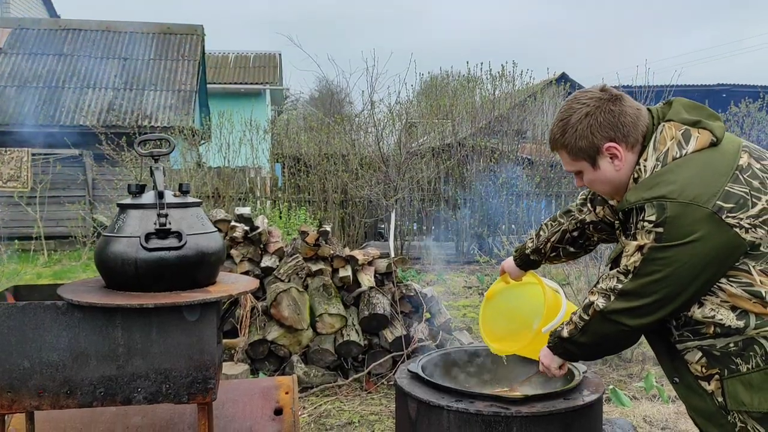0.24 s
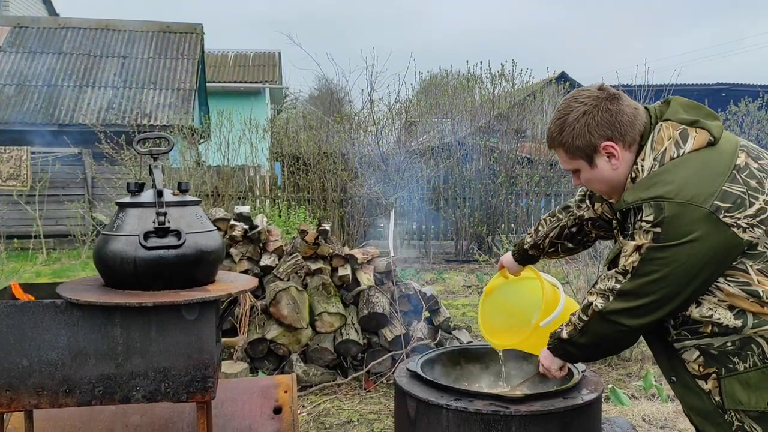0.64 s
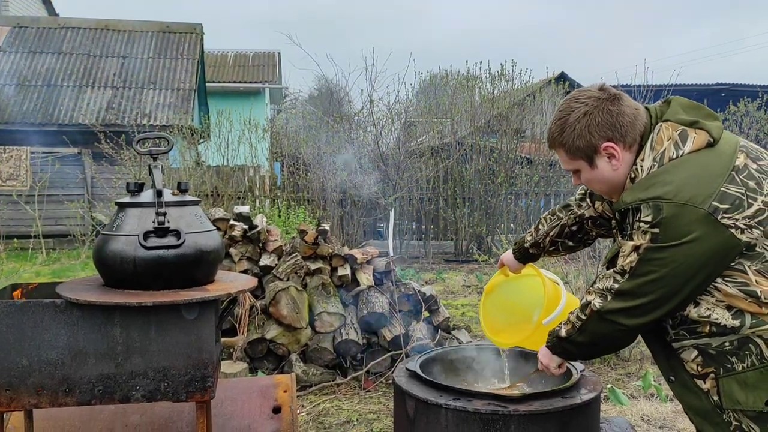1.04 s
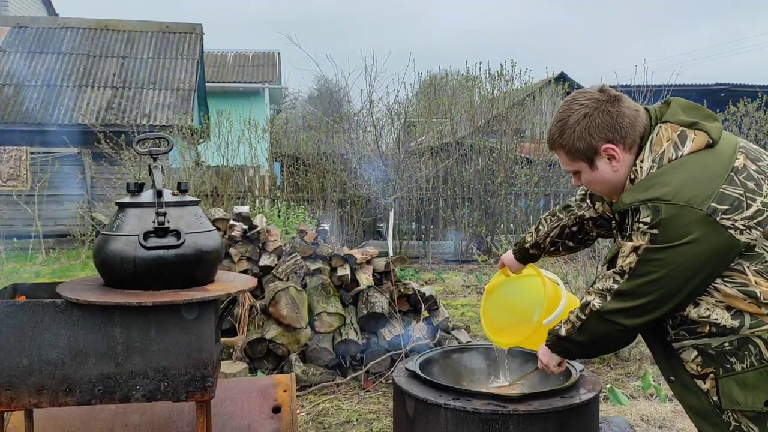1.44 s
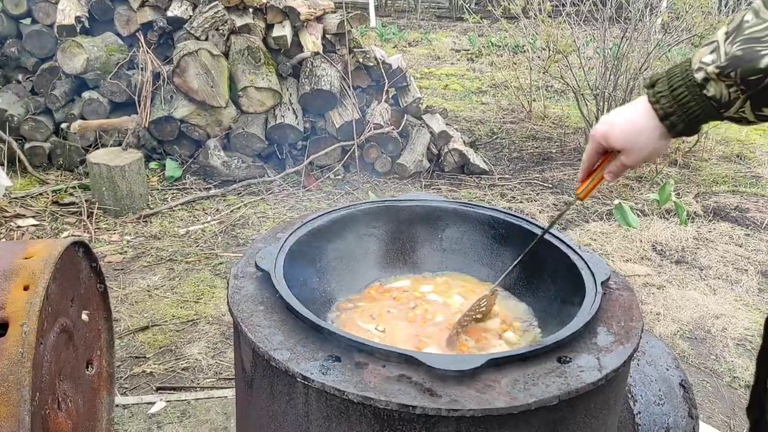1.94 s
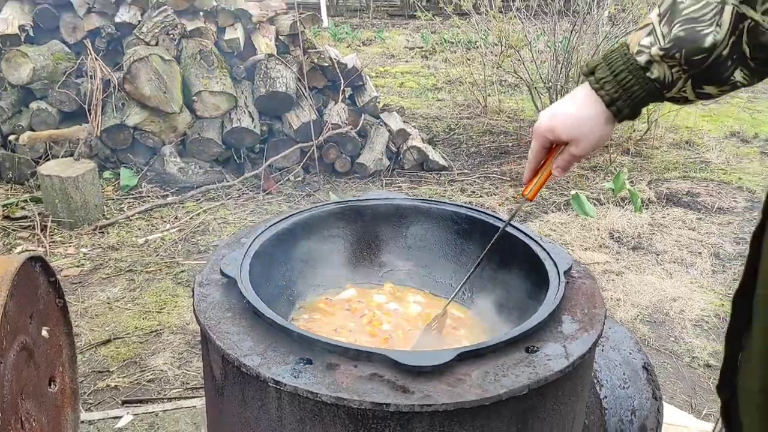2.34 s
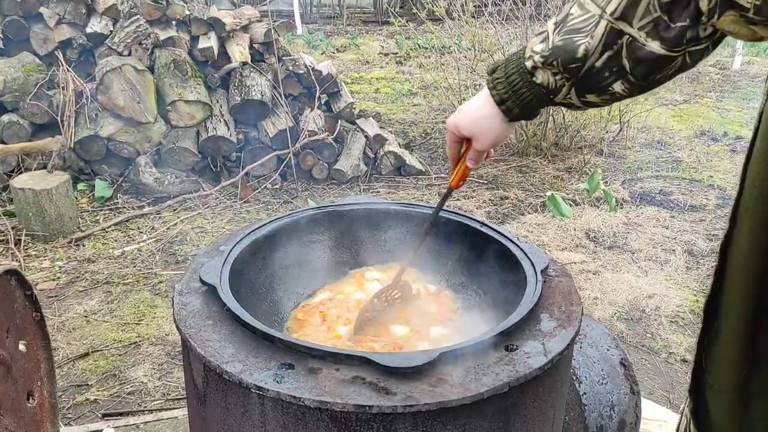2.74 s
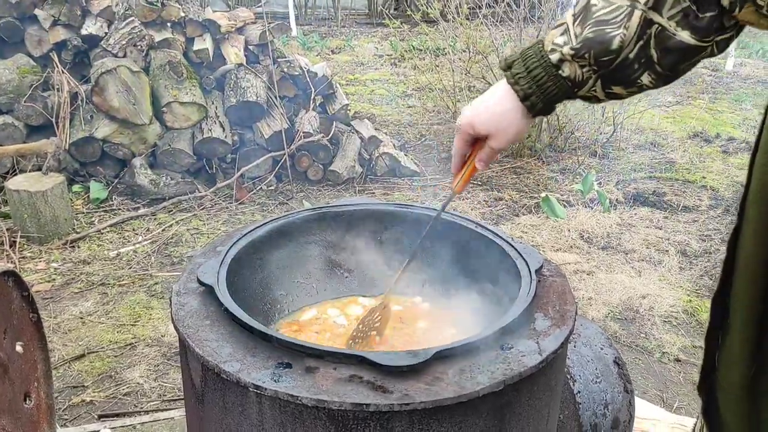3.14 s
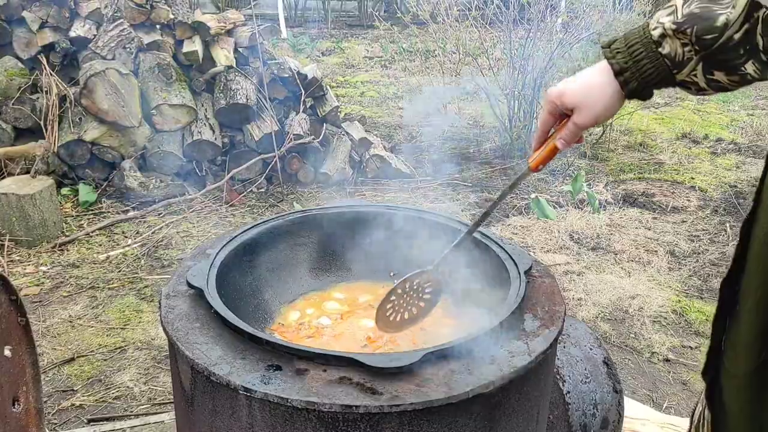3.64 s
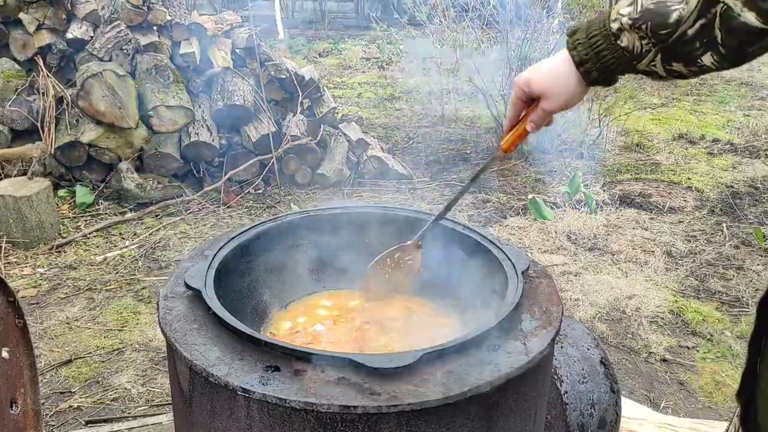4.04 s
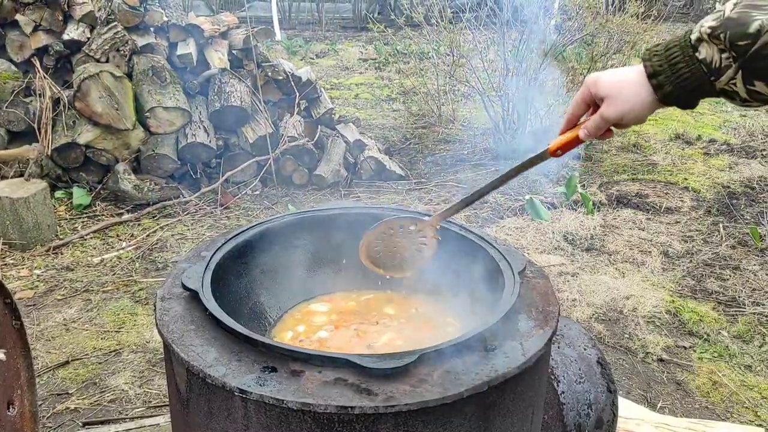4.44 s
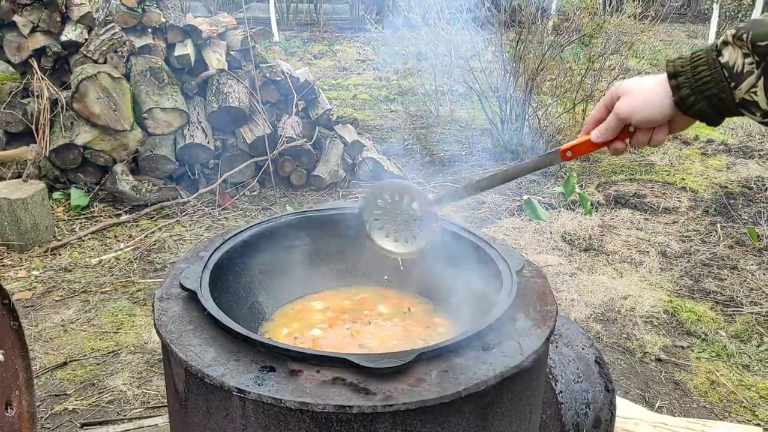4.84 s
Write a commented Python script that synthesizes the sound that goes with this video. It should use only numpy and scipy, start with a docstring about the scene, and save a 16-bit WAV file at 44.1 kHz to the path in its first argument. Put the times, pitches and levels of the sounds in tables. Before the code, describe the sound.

A bright, spiky sizzle comes from a short distance as water meets hot fat in an iron pot in the open air, while gusts rumble and thud on the microphone, then fade. A soft, deep thump marks a shift to a close position. The broth now boils with a thicker hiss, sharp spits and wet plops, swelling with each stir and easing off at the finish.

```python
"""Outdoors, water pours from a bucket onto fried food in a hot cast-iron pot. It fizzes on the iron,
drops spit in the fat and bubbles plop, while wind buffets the microphone and dies away.
At about 1.7 s the scene changes: with a deep thump, the pot fades in from close by. The broth sizzles
and bubbles, flaring up as a steel skimmer pushes it onto the hot wall, and calms near the end.
Throughout, the microphone's two openings (left and right) each colour the hiss in their own way."""
import sys
import numpy as np
from scipy import signal
from scipy.fft import rfft, irfft, next_fast_len
from scipy.io import wavfile
from scipy.ndimage import map_coordinates

SR = 44100
rng = np.random.default_rng(int(sys.argv[2]) if len(sys.argv) > 2 else 0)


def store_wav(level_fs):
    """Save 16-bit WAV to argv[1]."""
    pcm = np.round(np.clip(np.atleast_2d(level_fs), -1, 1) * 32767)
    wavfile.write(sys.argv[1], SR, pcm.T.astype(np.int16))


N = 225218


def pouring():
    """Water hits the hot fat a few steps away and makes a spiky crackle."""
    # tone of a bursting droplet from afar: frequency_hz, left_db, right_db
    far_tone = [(130, -49, -53), (373, -13.5, -15.5), (500, -35, -41), (635, -15.5, -23.5), (890, -21, -23),
                (1450, -19.5, -20.5), (2920, -13, -15), (4150, -20.5, -21), (5470, -10, -9.5),
                (7070, -15, 2.5), (8080, -4.5, -10), (10230, -17, -26.5), (12400, -16.5, -28),
                (15000, -20, -31)]
    fizz = unit(crackle(per_s=9000, spread_db=2, clump_db=1.37, scatter_s=5e-5, lag_s=5e-5))
    fizz += amp(-16) * ticking(per_s=79, ring_hz=7400, spread_db=2.5)
    boil = crackle(per_s=3500, spread_db=2, clump_db=1.8, scatter_s=7e-5, lag_s=5e-5)
    boil = unit(boil) + amp(-16) * bubbling(per_s=350, pitch_hz=2180, cycles=5.5, spread_db=3)
    hiss = sizzle(pour_levels(), far_tone, fizz, boil, fizz_gain_db=5, boil_gain_db=2.5)
    return hiss + spits(far_tone, gain_db=-3.5, ring_hz=7700, crack=0.11, spray_db=-23, spray_s=0.013)


def pour_levels():
    """Fizz and boil levels in dB: gushes reach fresh hot iron, lulls let it dry."""
    # gushes and lulls: time_s, extra_fizz_db, extra_boil_db
    gushes = [(.09, 4.5, 2), (.31, 1.5, 1), (.82, -1.5, -1), (.95, 0, 2.5), (1.07, 2.5, 1),
              (1.19, -1.5, 1.5), (1.35, -0.5, 4.5), (1.62, 2, 2)]
    steady_db = np.array([[-40.5], [-50.5]])  # fizz, boil
    gush_db = sum(np.outer([fizz, boil], swell(s, 0.067, 0.058)) for s, fizz, boil in gushes)
    return steady_db + gush_db + 0.54 * wobble(13.4)


def stirring():
    """Close by, the whole broth boils: a dense sizzle with fine spatter on top."""
    # tone of a bursting droplet close by: frequency_hz, left_db, right_db
    near_tone = [(121, -39.5, -43), (275, -16, -20.5), (530, -22, -28), (624, -15, -17.5),
                 (1180, -18.5, -19), (1525, -23, -17.5), (2360, -13, -13.5), (2980, -11.5, -18),
                 (3360, -14, -21.5), (3900, -19, -11.5), (6220, -11.5, -5.5), (7030, -17, 1),
                 (8060, -3, -4), (8340, -2, -7), (9300, -11.5, -10.5), (9660, -20, -22.5),
                 (11100, -15, -22), (12800, -18.5, -23.5), (15000, -17.5, -18)]
    levels_db = stir_levels()
    fizz = unit(crackle(per_s=12000, spread_db=3, clump_db=1.04, scatter_s=5e-5, lag_s=-3e-5))
    fizz += amp(-16.5) * ticking(per_s=110, ring_hz=7250, spread_db=2)
    boil = crackle(per_s=5000, spread_db=2.5, clump_db=1.5, scatter_s=6e-5, lag_s=-6.9e-5)
    boil = unit(boil) + amp(-12) * bubbling(per_s=700, pitch_hz=2019, cycles=7.44, spread_db=1.5)
    hiss = sizzle(levels_db, near_tone, fizz, boil, fizz_gain_db=4.5, boil_gain_db=1.5)
    hiss += amp(levels_db[0] - 24) * spatter()  # follows the fizz
    return hiss + spits(near_tone, gain_db=-2.5, ring_hz=7600, crack=0.75, spray_db=-15.5, spray_s=0.012)


def stir_levels():
    """Fizz and boil levels in dB: broth washing up the hot wall lifts mainly the fizz."""
    # the broth boils hard while stirred and calms when the skimmer lifts: time_s, level_db
    broth = [(2, -38.5), (2.3, -37), (2.5, -38.5), (2.95, -37), (3.43, -37), (3.75, -36.5), (4.1, -37.5),
             (4.3, -43), (4.95, -41), (5.1, -45.5)]
    # skimmer strokes, run-off and a lull: peak_s, extra_fizz_db, rise_s, fall_s
    flares = [(2.02, 0.5, 0.15, 0.036), (2.14, 4, 0.08, 0.044), (2.32, 1.5, 0.08, 0.11),
              (2.91, 4, 0.17, 0.042), (3.2, 1.5, 0.24, 0.048), (3.4, -3, 0.037, 0.16),
              (3.63, 1.5, 0.035, 0.07), (3.91, 4, 0.093, 0.12), (4.22, 3, 0.1, 0.52),
              (4.68, 1, 0.049, 0.079)]
    broth_db = np.interp(np.arange(N) / SR, *np.transpose(broth)) + 0.36 * wobble(14)
    flare_db = sum(db * swell(s, rise, fall) for s, db, rise, fall in flares)
    return np.array([broth_db + 7.5 + flare_db, broth_db + 0.29 * flare_db])


def sizzle(levels_db, tone, fizz, boil, fizz_gain_db, boil_gain_db):
    """High fizz where water meets hot iron, plus the lower seething of the broth."""
    fizz = unit(passed(coloured(fizz, tone), "high", 3960))
    boil = unit(passed(coloured(boil, tone), "low", 3810))
    return amp(levels_db[0] + fizz_gain_db) * fizz + amp(levels_db[1] + boil_gain_db) * boil


def crackle(per_s, spread_db, clump_db, scatter_s, lag_s, paths=3):
    """Tiny bursts all over the pot, heard directly and then bouncing off the iron wall."""
    count = int(per_s * N / SR)
    start = rng.uniform(0, N, count)
    strength = amp(spread_db * np.minimum(rng.exponential(size=count), 4.5))
    strength *= rng.choice([-1, 1], count)
    out = np.zeros((2, N))
    for bounce in range(paths):
        arrival = start + bounce * rng.uniform(.0004, .0014, count) * SR
        # each spot has its own delay between left and right
        skew = (lag_s + scatter_s * rng.standard_normal(count)) * SR / 2
        for side, at in enumerate([arrival - skew, arrival + skew]):
            out[side] += np.bincount(np.round(at).astype(int) % N, strength * 0.61 ** bounce, N)
    return out * amp(clump_db * wobble(70))  # droplets burst in clusters


def ticking(per_s, ring_hz, spread_db):
    """A few larger droplets stick out of the fizz, each with a tiny ring."""
    t = np.arange(SR // 500) / SR
    ring = np.sin(2 * np.pi * ring_hz * t) * np.exp(-t / 0.0004)
    drops = crackle(per_s, spread_db, clump_db=-3, scatter_s=3e-5, lag_s=0)
    return unit(signal.fftconvolve(drops, ring[None], axes=1)[:, :N])


def bubble(t, hz, cycles):
    """A bubble rings for a few cycles, rising in pitch as it surfaces."""
    age = t * hz / cycles
    rise = 1 + 0.037 * np.minimum(age, 4)
    return np.sin(2 * np.pi * hz * t * rise) * np.exp(-age) * (1 - np.exp(-6 * age))


def bubbling(per_s, pitch_hz, cycles, spread_db):
    """A swarm of small bubbles, each size ringing at its own pitch."""
    count, samples = int(per_s * N / SR), np.arange(500)
    hz = pitch_hz * 2 ** rng.triangular(-1.3, 0, .8, (count, 1))
    strength = amp(spread_db * np.minimum(rng.exponential(size=(count, 1)), 4))
    rings = strength * bubble(samples / SR, hz, cycles)
    at = (rng.integers(0, N, (count, 1)) + samples) % N
    return unit(np.bincount(at.ravel(), rings.ravel(), N))


def spits(tone, gain_db, ring_hz, crack, spray_db, spray_s):
    """Drops explode in hot fat: a sharp crack with a tiny ring, then spray and echoes in the pot."""
    # the loudest drops: start_s, level_db
    drops = [(0.25, -12.5), (0.3277, -12.5), (.486, -16.5), (0.637, -8.5), (.7952, -34), (0.883, -14.5),
             (.9305, -16), (0.9416, -16), (0.9467, -15.5), (0.9502, -12.5), (1.0762, -21), (1.0855, -11.5),
             (1.2716, -13.5), (1.2985, -20), (1.342, -22), (1.3528, -18), (1.5964, -10.5), (1.6228, -19),
             (1.914, -12), (2.0257, -8.5), (2.029, -10), (2.084, -4.5), (2.088, -11), (2.15, -10),
             (2.17, -8), (2.666, -11), (2.7132, -12), (2.7172, -8.5), (2.8807, -11), (2.905, -9),
             (2.9326, -3), (3.0136, -6.5), (3.0882, -5), (3.2525, -18), (3.447, -16), (3.636, -7.5),
             (3.88, -6), (3.903, -8.5), (3.919, -8), (3.9734, -12), (4.018, -13), (4.0864, -10.5),
             (4.23, -8), (4.2838, -18), (4.455, -25), (4.496, -15.5), (4.5582, -11), (4.644, -14),
             (4.702, -17), (4.752, -18), (4.892, -16), (4.9647, -16), (5.0574, -17.5), (5.0859, -19)]
    out, t = np.zeros((2, N)), np.arange(SR // 40) / SR
    for start_s, db in drops:
        hz = ring_hz * np.exp(0.035 * rng.standard_normal())
        ring = np.sin(2 * np.pi * hz * t) * np.exp(-t / 0.00015)
        ring[0] += crack
        echoes = amp(spray_db - 60 * t / spray_s) * rng.standard_normal((2, len(t)))
        echoes[:, :SR * 3 // 4000] = 0  # the wall answers 0.75 ms later
        echoes[:, 0] = 1  # the direct sound
        snap = coloured(signal.fftconvolve(echoes, ring[None], axes=1), tone)
        add(out, start_s, snap * amp(db + gain_db) / np.abs(snap.mean(0)).max())
    return out


def plops(gain_db=-9, splash_s=0.035):
    """Big bubbles burst, and near the end drips fall from the skimmer into the broth: a short ring and a wet
    splash that reaches lower for a bigger bubble or drop."""
    # big bubbles, and near the end drips off the skimmer: start_s, level_db, pitch_hz, ring_cycles, splash_gain
    bursts = [(.25, -26, 2600, 2, 1.5), (0.638, -25, 3010, 3, 1.5), (.754, -27, 2200, 2.2, 1.6),
              (.945, -27, 2600, 3, 1.3), (0.967, -30, 1900, 3.3, 1.3), (.977, -29, 2300, 3, 1.2),
              (1.139, -28.5, 1800, 3, 1.2), (1.353, -26, 2400, 2, 1.2), (1.385, -23.5, 1920, 3.2, 0.87),
              (1.596, -17.5, 2060, 7.3, 0.41), (1.604, -31, 2950, 8, .4), (2.564, -18.5, 2460, 2.7, 1.6),
              (2.905, -16, 2430, 3, 1.7), (3.012, -18.5, 2400, 3, 1.5), (3.195, -20, 2050, 16, 0.98),
              (3.933, -17, 865, 1.6, 1.8), (4.2295, -19, 935, 2.8, 1.4), (4.557, -16.5, 2500, 2.7, 1.5),
              (4.699, -14, 2170, 3.5, 1.2), (4.79, -20.5, 2400, 3.4, 1.6), (4.826, -22, 1010, 1.2, 2.1),
              (4.837, -21, 1900, 2.2, 1.8), (4.892, -27, 2320, 3, 1.2), (4.918, -25, 2290, 3, 1.6),
              (4.999, -21.5, 2100, 3, 1.3), (5.019, -28, 1800, 2.7, 1.3), (5.032, -23, 770, 1.2, 0.68)]
    out, t = np.zeros((2, N)), np.arange(SR // 25) / SR
    for start_s, db, hz, cycles, splash_gain in bursts:
        spray = rng.standard_normal(len(t)) + 0.61 * rng.standard_normal((2, len(t)))
        spray = passed(spray, "low", 3300, order=2)
        splash = passed(spray, "high", 0.41 * hz, order=2) * amp(-60 * t / splash_s)
        add(out, start_s, amp(db + gain_db) * (bubble(t, hz, cycles) + splash_gain * splash))
    return out


def spatter():
    """The finest droplets fly clear of the pot and tick, bright and dry."""
    ticks = crackle(per_s=350, spread_db=2.5, clump_db=2, scatter_s=3e-5, lag_s=0, paths=1)
    return unit(passed(ticks, "high", 10800))


def wind(breeze_db=-44, drop_at_s=0.99, drop_db_per_s=92):
    """A dying breeze rumbles and gusts flutter; each side of the microphone gets its own swirls."""
    # tone of wind on the microphone: frequency_hz, level_db
    wind_tone = [(20, 7), (50, 9), (120, -5.5), (180, -0.5), (300, -13.5), (420, -19.5), (520, -34),
                 (800, -39), (2000, -69)]
    # gusts: peak_s, level_db, half_length_s, right_share (0 to 1)
    gusts = [(0.02, -33, 0.054, 0.46), (0.153, -31.5, 0.11, 0.99), (0.251, -29, 0.034, 0.98),
             (0.47, -30, 0.028, 0.85), (0.534, -34, 0.047, 1), (0.67, -32, 0.05, 0.58),
             (0.96, -43.5, 0.028, 0.16), (1.05, -44, 0.045, 0.56), (1.224, -68, 0.04, 0.3),
             (1.373, -54, 0.021, 0.2), (1.486, -50, 0.0087, 0.17)]
    dying_s = np.maximum(np.arange(N) / SR - drop_at_s, 0)
    lull = amp([[-64], [-77]])  # left, right
    breeze = amp(breeze_db - drop_db_per_s * dying_s) + lull
    gusting = sum(pan(amp(db) * swell(s, half, half), right) for s, db, half, right in gusts)
    swirls = amp(2.5 * np.array([wobble(33.7), wobble(34.1)]))
    rumble = coloured(rng.standard_normal((2, N)), wind_tone)
    flutter = passed(coloured(rng.standard_normal((2, N)), wind_tone), "high", 91, order=1)
    return breeze * unit(swirls * rumble) + gusting * unit(swirls * flutter)


def bumps(gain_db=-2.5, roughness=0.85):
    """Air or a touch thuds on the microphone: a push that swings back ever more slowly."""
    # thuds: start_s, level_db, pitch_hz, length_s, pitch_sag, right_share (0 to 1)
    thuds = [(0.132, -23, 131, 0.0043, .45, .95), (0.242, -20, 400, 0.026, 0.5, .99),
             (.521, -21, 220, 0.0063, .3, .85), (0.615, -18, 276, 0.01, 0.41, 0.95),
             (0.663, -28.5, 340, 0.0078, .45, 0.85), (0.784, -35, 290, 0.0062, .45, 0.7),
             (.91, -36, 290, 0.0069, 0.4, 0.8), (0.97, -33.5, 170, 0.0083, .45, 0.2),
             (1.748, -30.5, 420, 0.0056, 0.33, 0.08), (1.758, -32, 220, 0.008, .3, 0),
             (4.1885, -19.5, 1050, 0.0022, .3, 0), (4.19, -18.5, 380, 0.0037, .5, 0.03),
             (4.199, -24.5, 190, 0.0094, .25, 0.04), (4.2, -26, 80, .011, .15, .03)]
    out, t = np.zeros((2, N)), np.arange(SR // 8) / SR
    for start_s, db, hz, length_s, sag, right in thuds:
        age = t / length_s
        flutter = unit(passed(rng.standard_normal(2 * len(t)), "low", hz * 1.13)[len(t):])
        swing = np.sin(2 * np.pi * np.cumsum(hz / (1 + sag * age)) / SR)
        thud = passed(age * np.exp(-2 * age) * (swing + roughness * flutter), "high", 34, order=2)
        add(out, start_s, amp(db + gain_db) * pan(thud / np.abs(thud).max(), right))
    return out


def thump(start_s=1.754, rise_s=0.0041, swing_back_s=0.088, fade_s=0.18):
    """A soft low thump, mainly left, opens the close scene; the microphone then settles unheard."""
    t = np.maximum(np.arange(N) / SR - start_s, 0)
    offset = (1 - np.exp(-(t / rise_s) ** 2)) * (1 - t / swing_back_s) * np.exp(-t / fade_s)
    return amp(-35) * np.outer([1, 0.45], offset)


def open_air():
    """The faint, steady rumble of the outdoors."""
    # tone of open air: frequency_hz, level_db
    air_tone = [(20, 19), (60, 9), (150, -7), (400, -3), (1500, -33), (8000, -48)]
    return amp(-65.5) * unit(coloured(rng.standard_normal((2, N)), air_tone))


def amp(db):
    """Turns decibels into a gain."""
    return 10 ** (np.asarray(db) / 20)


def unit(x):
    """Scales a sound to an average (rms) level of 1."""
    return x / np.sqrt(np.mean(x ** 2) + 1e-20)


def swell(peak_s, rise_s, fall_s):
    """A bell-shaped curve that rises to 1 and falls again."""
    t = np.arange(N) / SR - peak_s
    return np.exp(-(t / np.where(t < 0, rise_s, fall_s)) ** 2)


def wobble(per_s):
    """A smooth curve through per_s random values a second."""
    return map_coordinates(rng.standard_normal(int(N * per_s / SR) + 4), [np.arange(N) * per_s / SR])


def coloured(x, tone, size=4096):
    """Filters x by a tone table: one dB column for both sides, or one for each."""
    hz, *columns = np.transpose(tone)
    grid = np.log(np.fft.rfftfreq(size, 1 / SR) + 1)
    gains = amp([np.interp(grid, np.log(hz), db) for db in columns])
    cepstrum = irfft(np.log(gains))
    # fold it so that the filter rings only after a click, never before
    cepstrum[:, 1:size // 2] *= 2
    cepstrum[:, size // 2 + 1:] = 0
    return signal.fftconvolve(x, irfft(np.exp(rfft(cepstrum))), axes=1)[:, :N]


def passed(x, kind, edge_hz, order=4):
    """Keeps the "high" or the "low" side of edge_hz."""
    return signal.sosfilt(signal.butter(order, edge_hz, kind, fs=SR, output="sos"), x)


def pan(sound, right_share):
    """Shares a sound between left and right."""
    return np.outer([1 - right_share, right_share], sound)


def add(track, start_s, sound):
    """Mixes a sound into the track."""
    part = track[:, max(round(start_s * SR), 0):][:, :sound.shape[-1]]
    part += sound[..., :part.shape[1]]


def scene():
    """First the pouring and wind from a few steps away, then the stirred pot fades in close by."""
    change_s, dip_end_s, fade_in_s = 1.714, 1.73, 0.3
    t = np.arange(N) / SR
    air = open_air()
    far = (t < change_s) * (pouring() + wind())
    fade_in = np.clip((t - change_s) / fade_in_s, 0, 1) ** 0.77
    dip = np.where(t > dip_end_s, 1, amp(-7.5))
    near = fade_in * dip * stirring()
    return far + near + air + thump() + plops() + bumps()


def record(dry):
    """Removes the very highest treble."""
    top_hz = 15550
    size = next_fast_len(N + SR // 2)
    return irfft(rfft(dry, size) * (np.fft.rfftfreq(size, 1 / SR) < top_hz), size)[:, :N]


dry = scene()
out = record(dry)
store_wav(out)
```